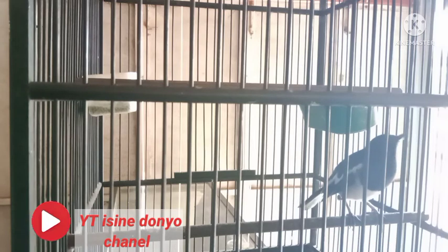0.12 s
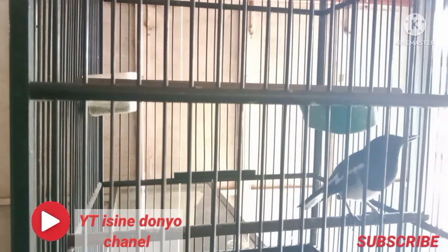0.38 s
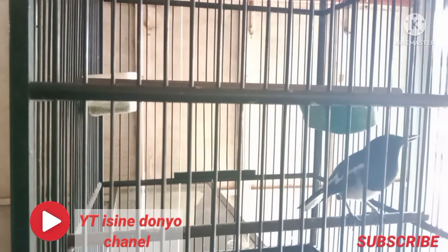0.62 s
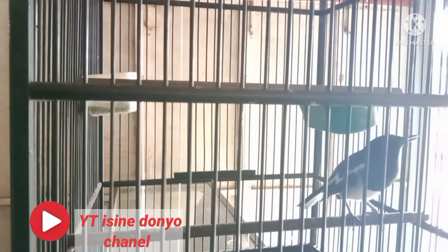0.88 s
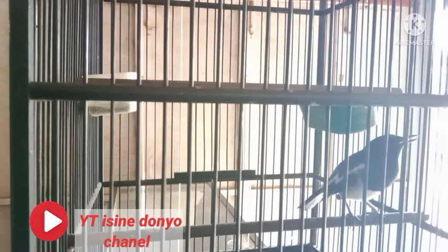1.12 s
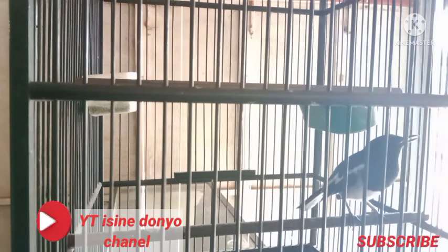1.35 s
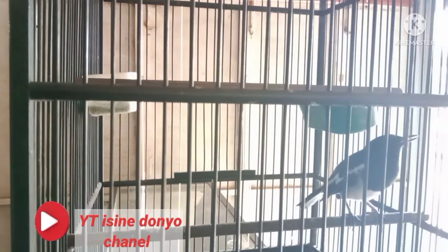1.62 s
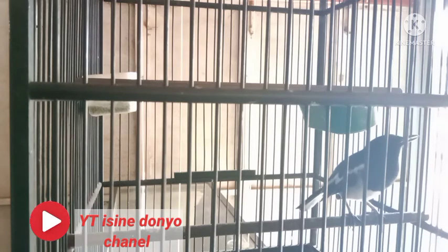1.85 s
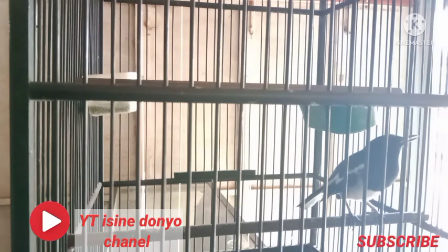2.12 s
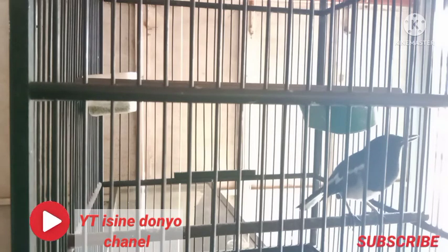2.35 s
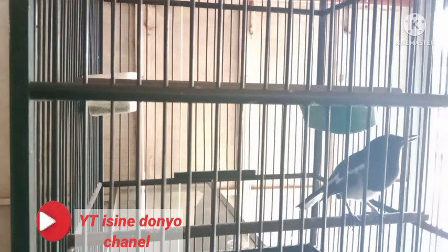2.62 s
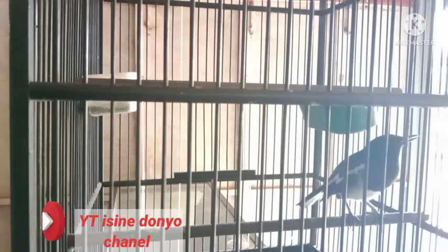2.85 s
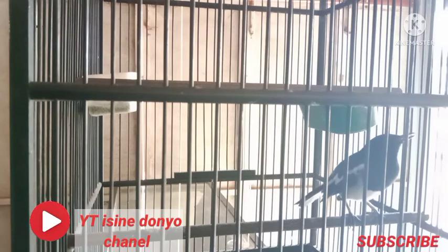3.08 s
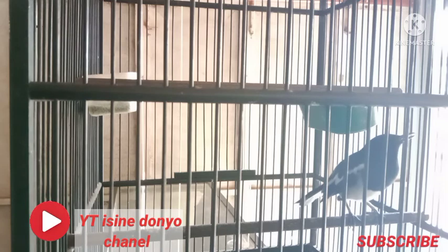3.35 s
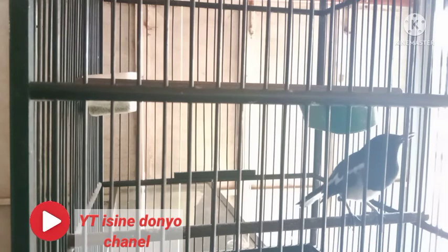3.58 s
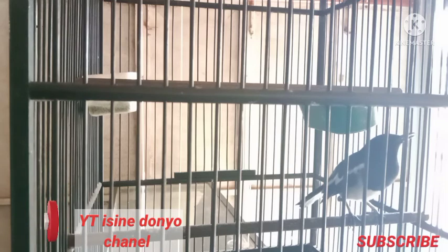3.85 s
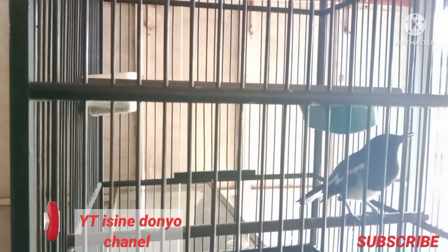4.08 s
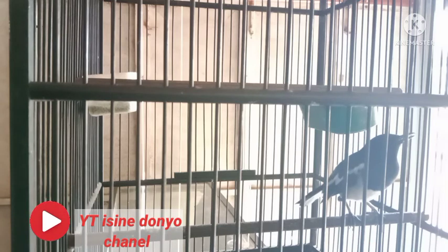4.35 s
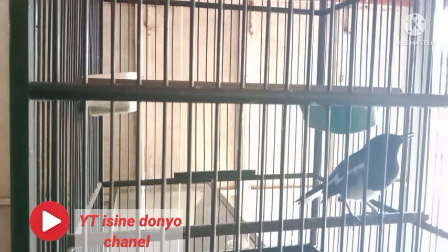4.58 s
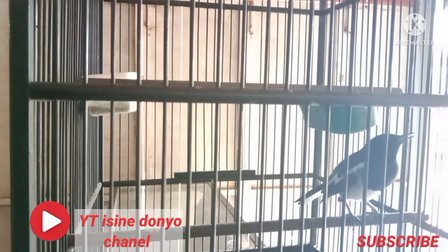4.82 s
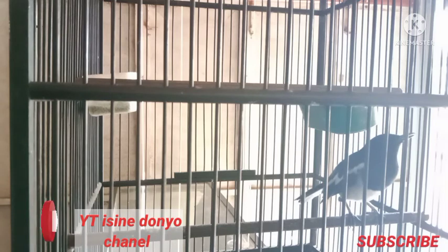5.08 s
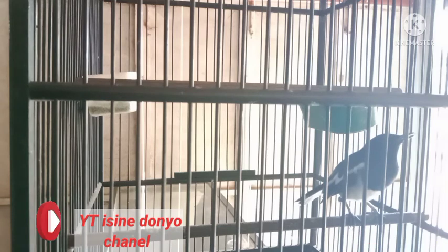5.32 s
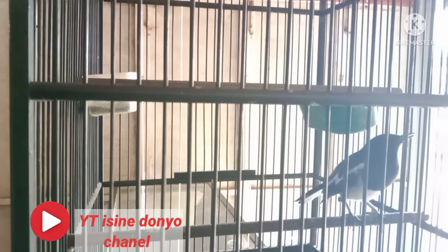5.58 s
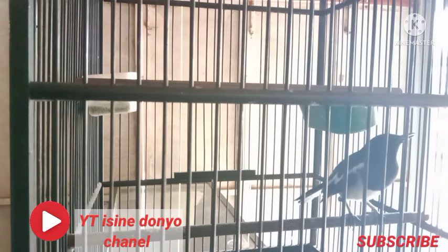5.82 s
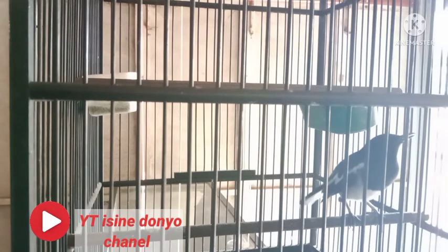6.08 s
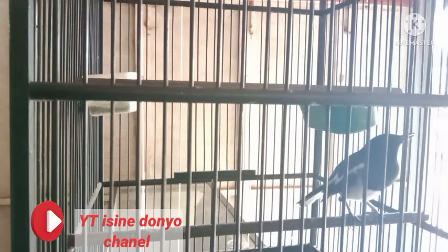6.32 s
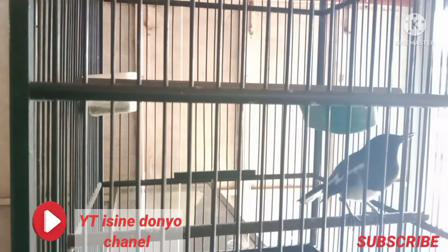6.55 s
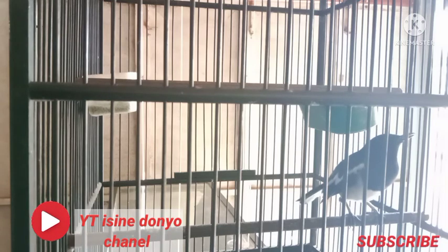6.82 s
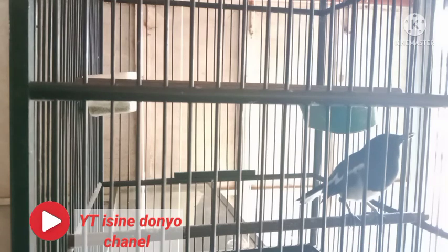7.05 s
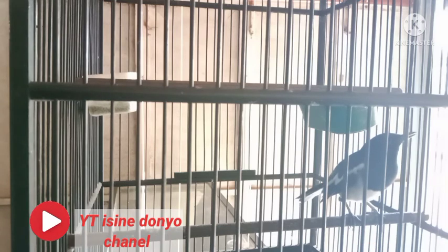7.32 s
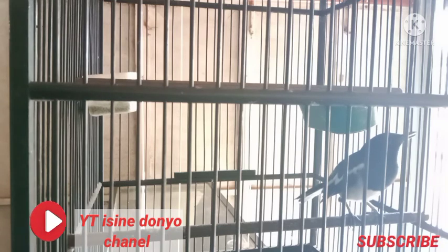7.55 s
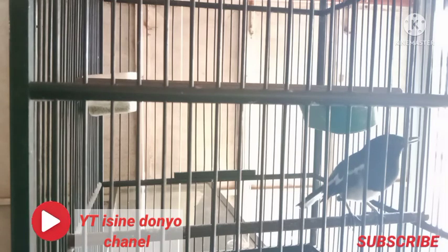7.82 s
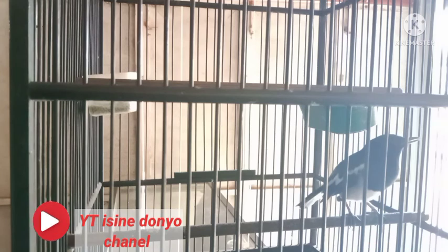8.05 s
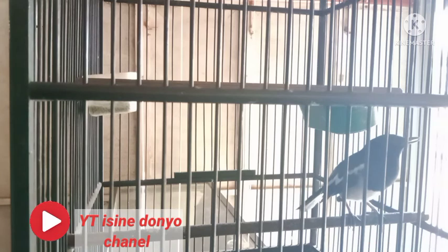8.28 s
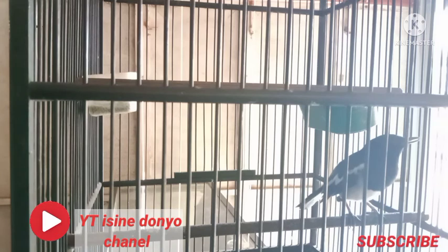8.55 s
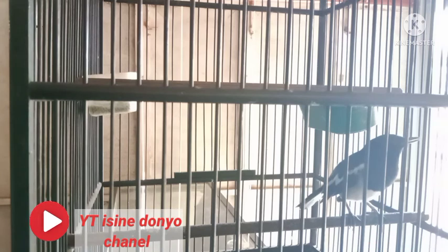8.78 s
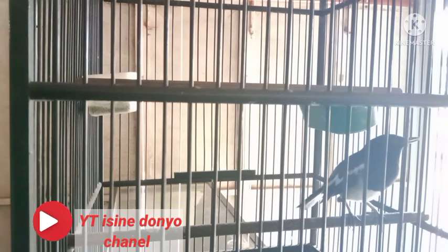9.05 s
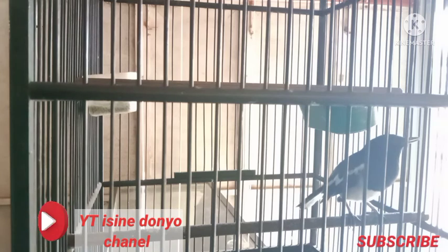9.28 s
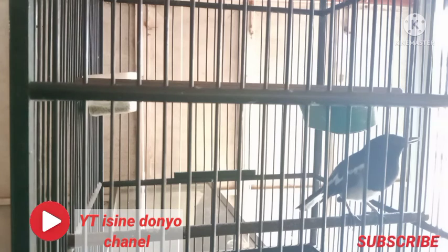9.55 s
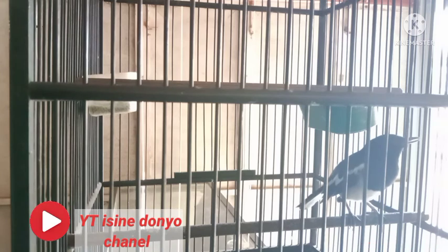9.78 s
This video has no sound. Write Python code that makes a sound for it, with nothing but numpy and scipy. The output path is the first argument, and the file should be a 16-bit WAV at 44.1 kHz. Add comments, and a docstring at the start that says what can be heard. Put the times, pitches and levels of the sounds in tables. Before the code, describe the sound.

A small caged bird sings close by in a hard-walled porch. Soft, spaced nasal ticks and chirps come first, then a rapid twitter grows into loud whistles, squawks and a piercing squeal. Three sharp falling sweeps follow, then clicking chirps, a harsh buzzy rasp and sparse quiet notes. Street rumble and tyre hiss swell mainly under the loud song. A phone-like microphone suppresses the background between phrases.

```python
"""A caged songbird sings in a hard-walled porch: gliding whistles, nasal scratchy notes and a loud rasp.
Each note is a sum of overtones on a gliding pitch, shaped by throat and beak and answered by the walls.
Behind lie street noise, made of coloured flickering noise, a far motor hum of two wavering sines and
faint thin tones, one of them a motor whine; a faint sinking whine, likely a motor, shares the song's path.
A phone's noise suppressor lets them up mainly while the scene is loud; peaks over full scale clip."""
import sys
import numpy as np
from scipy import signal
from scipy.io import wavfile
from scipy.ndimage import uniform_filter1d, minimum_filter1d, map_coordinates

SR = 44100
rng = np.random.default_rng(int(sys.argv[2]) if len(sys.argv) > 2 else 0)


def store_wav(level_fs):
    """Save 16-bit WAV to argv[1]."""
    pcm = np.round(np.clip(np.atleast_2d(level_fs), -1, 1) * 32767)
    wavfile.write(sys.argv[1], SR, pcm.T.astype(np.int16))


def nominal_scale(level):
    """Amplitude ratio for a level in decibels (scalar or array-like)."""
    x = np.asarray(level, float) / 20
    return 10 ** x


N = 437031  # samples

# resonance of the throat: hz, level_db
THROAT_RESONANCE = [(800, -15.5), (1700, -12), (3400, -4.5), (4500, -7.5), (7500, -3.5), (9500, -11.5),
                    (12000, -43)]


def along(points, hz):
    """Interpolation on a logarithmic frequency axis through (Hz, value) points."""
    f, v = np.transpose(points)
    return np.interp(np.log(hz + 1), np.log(f + 1), v)


def unit(x):
    """Normalization to an rms of 1."""
    return x / np.sqrt(np.mean(x ** 2) + 1e-20)


def wobble(rate, size):
    """Band-limited random modulation: a smooth curve through rate random knots a second."""
    knots = rng.standard_normal(int(size * rate / SR) + 4)
    return map_coordinates(knots, [np.arange(size) * rate / SR])


def flicker(spectrum, patchy_db):
    """Nonstationary noise: narrow bands of a coloured spectrum come and go independently."""
    hz, _, z = signal.stft(rng.standard_normal(N), SR, nperseg=1024)
    field = uniform_filter1d(rng.standard_normal(z.shape), size=3, axis=0)
    field = uniform_filter1d(field, size=15, axis=1)
    corner_hz, corner_db = np.transpose(spectrum)
    colour_db = np.interp(np.log(hz + 1), np.log(corner_hz), corner_db, -120, -120)
    z = z * nominal_scale(colour_db[:, None] + patchy_db * unit(field))
    return unit(signal.istft(z, SR, nperseg=1024)[1][:N])


def spell(s, length, edge_s, first_db, last_db):
    """Amplitude envelope: straight ramps at both edges, and a level that moves evenly in dB between."""
    t = np.arange(N) / SR - s
    ramps = np.clip(np.minimum(t, length - t) / edge_s, 0, 1)
    return ramps * nominal_scale(np.interp(t, [0, length], [first_db, last_db]))


def scratches():
    """Turbulence: short bursts of air noise filtered by the throat, at the edges of notes."""
    # bursts: peak_s, peak_db
    scratch_rows = [(0, -34), (3.165, -21.5), (4.089, -29.5), (4.45, -30)]
    rise_s, t60_s = 0.004, 0.15  # the rise gains 20 dB in rise_s
    t = np.arange(N) / SR
    gain = 0
    for s, db in scratch_rows:
        slope_db = np.where(t < s, 20 * (t - s) / rise_s, -60 * (t - s) / t60_s)
        gain = gain + nominal_scale(db + slope_db)
    return gain * flicker(THROAT_RESONANCE, patchy_db=2.0)


def street():
    """Incoherent sum of far sources: steady bass and hiss, rumble, a rush of tyres, and surges of both."""
    # spectrum of the rumble: hz, density_db
    rumble_colour = [(130, -41), (240, 3.5), (650, -4), (850, -16.5), (1200, -39.5)]
    # spectrum of the tyre rush: hz, density_db
    rush_colour = [(600, -14), (850, -17.5), (1120, -5.5), (1350, -9), (1700, -7), (2400, -15),
                   (3060, -27.5), (5000, -42), (10000, -49)]
    # spectrum of the steady bass and hiss: hz, density_db
    steady_colour = [(60, -10.5), (200, -9.5), (400, -31), (6100, -34.5), (6700, -21), (10000, -32),
                     (12000, -48)]
    # course of the traffic: time_s, rush_db
    traffic_course = [(0, -46.5), (1.199, -52), (2, -42.5), (3.06, -39), (3.831, -36.5), (4.5, -44),
                      (5.7, -63.5), (7.6, -54.5), (8.1, -71.5), (9.91, -50.5)]
    # loud bursts of street noise: start_s, length_s, rumble_db, rush_db
    surge_rows = [(3.08, 0.77, -27, -20), (7.704, 0.348, -47.5, -42.5)]
    edge_s, rumble_db_per_s, rush_db_per_s = 0.077, -9, -13  # surges sink at these slopes
    rush_db = np.interp(np.arange(N) / SR, *np.transpose(traffic_course))
    rumble_db = -58 + 0.36 * (rush_db + 46.5)  # the rumble follows the rush weakly
    far = nominal_scale(-58.0) * flicker(steady_colour, patchy_db=6.5)
    far += nominal_scale(rumble_db) * flicker(rumble_colour, patchy_db=5.5)
    far += nominal_scale(rush_db) * flicker(rush_colour, patchy_db=3)
    low = sum(spell(s, d, edge_s, db, db + d * rumble_db_per_s) for s, d, db, _ in surge_rows)
    high = sum(spell(s, d, edge_s, db, db + d * rush_db_per_s) for s, d, _, db in surge_rows)
    return far + low * flicker(rumble_colour, patchy_db=4.5) + high * flicker(rush_colour, patchy_db=3.0)


def nasals():
    """Pitch glide at a constant rate: a held tone bends; louder notes swell more and are rougher."""
    # nasal notes: start_s, length_s, bend_share (of length, before the bend), held_hz, last_hz, peak_db,
    # overtone_fall_db (per overtone)
    nasal_rows = [(0.329, 0.074, 0.76, 836, 900, -34, -8.5), (0.76, 0.12, 0.52, 840, 1030, -33.5, -3),
                  (1.256, 0.048, 0.36, 1624, 1794, -32, -2.5), (1.856, 0.043, 0.504, 1235, 1152, -35.5, -4),
                  (4.031, 0.074, 0.71, 892.5, 770, -16.5, -2), (5.344, 0.096, 0.81, 895, 762.5, -17.5, -1),
                  (7.701, 0.09, 0.73, 1603, 1771, -18.5, -3.5),
                  (9.114, 0.055, 0.43, 1597, 1387, -38.5, -5.5)]
    bend_hz_per_s, peak_share = 11000, 0.88  # the level peaks at this share of the way to the bend
    scoop = 0.045  # share under the held pitch at the start
    swell, soft_db = 0.5, -42  # the onset lies this share of the way from the peak down to soft_db
    for s, length, share, hz, last_hz, db, fall_db in nasal_rows:
        onset = min(0.012, 0.42 * length)
        bend = length * np.clip(share, 0.35, 0.9)
        bent = min(bend + abs(last_hz - hz) / bend_hz_per_s + 0.00083, length - 0.001)
        peak = max(peak_share * bend, onset + 0.001)
        t = np.unique([0, onset, peak, bend, bent, length])
        pitch = np.interp(t, [0, onset, bend, bent], [hz * (1 - scoop), hz, hz, last_hz])
        onset_db = db - swell * (db - soft_db)
        level = np.interp(t, [0, onset, peak, length], [onset_db - 7.5, onset_db, db, db - 3.5])
        rough = 0.1 + 0.004 * (db + 37)
        yield fall_db, rough, np.transpose([s + t, pitch, level])


def warbles():
    """Free frequency modulation: whistles, rasps and one faint sinking whine follow their own contours."""
    # overtone_fall_db (per overtone), roughness (0-1), contour rows: time_s, pitch_hz, level_db;
    # the faint sinking whine at 7.86 s is likely a motor
    warble_rows = [(-64, 0.16, [(.4, 1755, -32), (.43, 2030, -40.5), (.457, 2950, -45)]),
                   (-6.5, 0.091, [(1.325, 2598, -33.5), (1.369, 4684, -23), (1.389, 4605, -37),
                   (1.415, 3737, -39.5), (1.455, 3724, -29), (1.5, 3750, -32.5), (1.545, 4230, -33.5),
                   (1.577, 4719, -22)]), (-6, 0.047, [(1.98, 3370, -41), (1.996, 3937, -35),
                   (2.132, 4260, -32), (2.168, 4170, -29.5), (2.19, 2894, -41.5), (2.222, 2910, -67),
                   (2.234, 3380, -26.5), (2.244, 3280, -45)]), (-40, 0.029, [(2.335, 2500, -35),
                   (2.369, 2580, -25), (2.382, 2985, -28.5), (2.395, 2224, -27)]),
                   (-16.5, 0.075, [(2.457, 3180, -38.5), (2.475, 3760, -28.5), (2.492, 3533, -28),
                   (2.501, 3700, -37), (2.527, 3150, -23.5)]), (-10, 0.066, [(2.528, 2723, -39),
                   (2.603, 3280, -33.5)]), (-10, 0.045, [(2.707, 3553, -41.5), (2.737, 3930, -29),
                   (2.751, 3127, -28), (2.772, 3543, -27), (2.787, 3060, -39), (2.798, 2290, -30)]),
                   (-29.5, .03, [(3.108, 2900, -36.5), (3.125, 3500, -30), (3.15, 3770, -28.5)]),
                   (-10.5, .04, [(3.03, 4190, -48.5), (3.045, 4800, -40.5), (3.078, 4825, -33),
                   (3.092, 4780, -19.5), (3.14, 4805, -13), (3.16, 3190, -27.5)]),
                   (-10.5, 0.058, [(3.175, 2563, -23), (3.191, 4150, -18), (3.235, 4400, -15),
                   (3.28, 4054, -12.5), (3.3, 4150, -19), (3.315, 3440, -21.5)]),
                   (-14, 0.021, [(3.33, 3656, -13), (3.37, 3777, -22), (3.385, 3981, -18.5),
                   (3.474, 3730, -14), (3.51, 3460, -22.5)]), (-21.5, .021, [(3.668, 2500, -19),
                   (3.712, 2792, -22), (3.74, 2514, -20.5)]), (-23, .03, [(4.451, 1897, -34),
                   (4.458, 3520, -13), (4.47, 3100, -12), (4.483, 2640, -22.5)]),
                   (-10, 0.14, [(4.772, 3190, -35), (4.79, 4432, -26.5), (4.812, 4583, -18),
                   (4.83, 5840, -10), (4.85, 5940, -8.5), (4.925, 6385, -7.5), (5.03, 6070, -10)]),
                   (-9.5, 0.46, [(4.87, 2590, -36.5), (4.99, 3801, -27.5), (5.03, 3850, -33.5)]),
                   (-6.5, 0.065, [(5.74, 1397, -41.5), (5.768, 1915, -26.5), (5.794, 2186, -28)]),
                   (-37, .03, [(5.796, 2271, -22.5), (5.862, 3070, -23), (5.892, 3543, -25)]),
                   (-5, 0.052, [(5.892, 3678, -32.5), (5.912, 5900, -29), (5.919, 5520, -24),
                   (5.938, 5400, -9.5), (5.952, 4850, -15), (5.972, 4540, -15.5), (5.976, 4800, -18),
                   (5.987, 3850, -19.5), (5.998, 4950, -16.5), (6.006, 4150, -25.5), (6.014, 5000, -26.5),
                   (6.026, 4600, -29)]), (-37, 0.053, [(7.305, 2850, -23.5), (7.333, 2954, -27.5),
                   (7.349, 2439, -14.5), (7.369, 3130, -29), (7.387, 2648, -18.5), (7.407, 2230, -24)]),
                   (-1, 0.66, [(7.86, 2127, -39), (7.995, 1994, -52.5)]), (-2, .16, [(8.416, 1499, -45),
                   (8.47, 1735, -35), (8.54, 1806, -31.5), (8.705, 2133, -36)]),
                   (-14.5, 0.398, [(9.14, 2280, -42), (9.172, 2258, -30.5), (9.184, 3007, -40),
                   (9.192, 2230, -32.5)]), (-8.5, 0.068, [(9.57, 3485, -50.5), (9.602, 4354, -31),
                   (9.732, 5222, -28), (9.77, 4500, -33), (9.802, 4885, -27.5), (9.82, 2475, -40.5)])]
    yield from warble_rows


def trills():
    """Alternating frequency modulation: swings start high, shorten and sink, louder at the high turns."""
    # trills: start_s, length_s, high_hz, low_hz, low_db, overtone_fall_db (per overtone), swings (count)
    trill_rows = [(1.568, 0.066, 5030, 2475, -29.5, -10, 5)]
    shrink, sink, high_db, rough = 0.66, 0.022, 1.5, 0.073  # length ratio and pitch share per swing
    for s, length, high_hz, low_hz, db, fall_db, swings in trill_rows:
        k = np.arange(round(swings) + 1)
        t = s + length * (1 - shrink ** k) / (1 - shrink ** k[-1])
        pitch = np.where(k % 2, low_hz, high_hz) * (1 - sink * k)
        yield fall_db, rough, np.transpose([t, pitch, db + high_db * (1 - k % 2)])


def chirps():
    """Rapid frequency glide: the pitch scoops up, sags and drops, loudest where the drop begins."""
    # chirps: start_s, length_s, drop_share (of length, before the drop), top_hz, last_hz, peak_db,
    # overtone_fall_db (per overtone)
    chirp_rows = [(3.603, 0.05, 0.49, 3556, 3250, -8.5, -30), (7.119, 0.051, 0.77, 2676, 2070, -20, -43.5),
                  (7.244, 0.089, 0.37, 3740, 3190, -25.5, -31.5),
                  (7.431, 0.0091, 0.56, 4903, 2237, -25.5, -17),
                  (9.868, 0.071, 0.31, 3500, 3070, -28.5, -21)]
    scoop, scoop_s, sag, rough = 0.13, 0.008, 0.038, 0.024  # scoop and sag are shares under the top
    for s, length, knee, hz, last_hz, db, fall_db in chirp_rows:
        knee = np.clip(knee, 0.4, 0.95)
        yield fall_db, rough, [
            (s, hz * (1 - scoop), db - 11.5),
            (s + min(scoop_s, 0.28 * length), hz, db - 5),
            (s + knee * length, hz * (1 - sag), db),
            (s + length, last_hz, db - 1)]


def sweeps():
    """Stepped frequency sweep: the pitch climbs to a top, falls to a sagging ledge and falls again."""
    # sweeps: start_s, top_s (time near the top), drop_s (fall to the ledge), length_s, last_hz,
    # top_db, ledge_db
    sweep_rows = [(6.096, .022, 0.0091, 0.095, 2383, -9, -16.5),
                  (6.277, 0.023, .028, 0.11, 2554, -17.5, -14.5),
                  (6.47, 0.0026, 0.028, 0.088, 1887, -12, -20.5)]
    start_hz, top_hz, ledge_hz, ledge_end_hz = 5900, 6830, 4800, 4380
    fall_db, rough, ledge_end = -8, 0.019, 0.71  # per overtone; 0-1; share of length
    for s, top, drop, length, last_hz, top_db, ledge_db in sweep_rows:
        yield fall_db, rough, [
            (s, start_hz, top_db - 11),
            (s + 0.55 * top, top_hz, top_db - 9.5),
            (s + top, 0.98 * top_hz, top_db),
            (s + top + drop, ledge_hz, ledge_db - 3),
            (s + ledge_end * length, ledge_end_hz, ledge_db),
            (s + length, last_hz, ledge_db - 6.5)]


def note(fall_db, rough, rows):
    """Source and filter: the syrinx gives overtones of an unsteady pitch, and the throat colours them."""
    # unstable stretches, where the vibration repeats only every few cycles, adding lines between the
    # overtones, and the pitch trembles: start_s, end_s, period_cycles, depth_db, tremble_share
    fork_rows = [(4.872, 5.014, 2, -22.5, 0.059), (5.354, 5.396, 5, -7.5, 0.019),
                 (5.942, 6.02, 3, -3, 0.004), (7.695, 7.744, 2, 2.5, 0.019),
                 (7.757, 7.823, 2, -2.5, 0.0041), (8.461, 8.528, 2, -39, .06), (8.531, 8.7, 2, -13.5, .13),
                 (0.837, 0.89, 2, -7.5, 0.061), (4.079, 4.099, 3, -2.5, 0.027)]
    # the other half of the syrinx joins the long rasp: time_s, pitch_hz, level_db (over the first voice)
    second_voice = [(8.449, 2112, -7), (8.469, 2869, 2.5), (8.518, 3000, -4), (8.69, 2500, -8)]
    second_mix = 0.34  # depth of its beating with the first voice, giving sum and difference tones
    hole_hz, hole_width_hz, hole_per_db = 5700, 800, 3  # gap in the overtones, deeper with less effort

    s, hz, db = np.transpose(rows)
    t = np.arange(s[0], s[-1], 1 / SR)
    size = len(t)
    swing = np.sin(2 * np.pi * np.cumsum(60 + 14 * wobble(30, size)) / SR)
    waver = 0
    for start, end, _, _, share in fork_rows:
        waver = waver + share * np.clip(np.minimum(t - start, end - t) / 0.01, 0, 1)
    level_db = np.interp(t, s, db)
    slack_db = max(db) - level_db  # less effort gives a darker and cleaner tone
    # once strained, it stays rough
    rough = rough * nominal_scale(-0.6 * (max(db) - np.maximum.accumulate(level_db)))

    contour = np.interp(t, s, hz)
    smooth = uniform_filter1d(contour, size=SR // 200, mode="nearest")
    drift = (0.005 + 0.3 * rough ** 2) * wobble(50, size)
    jitter = 0.085 * rough * wobble(400, size)
    pitch = smooth * (1 + waver * swing + drift + jitter)
    phase = 2 * np.pi * np.cumsum(pitch) / SR

    k = np.arange(1, 15)[:, None]  # overtone number, 1 = fundamental
    gain = nominal_scale((fall_db - 0.18 * slack_db) * (k - 1) + along(THROAT_RESONANCE, k * pitch))
    gain *= k * pitch < 16000
    # at full effort the gap turns into a slight bump
    hole_shape = (k > 1) * np.exp(-((k * pitch - hole_hz) / hole_width_hz) ** 2)
    gain *= nominal_scale(-hole_per_db * np.minimum(slack_db - 1.5, 8) * hole_shape)
    # rough overtones break up one by one
    gain *= nominal_scale(8.1 * rough * np.array([wobble(60, size) for _ in k]))
    overtones = gain * np.cos(k * phase + np.pi * rng.random(k.shape))
    tone = overtones.sum(0) / np.sqrt((gain ** 2).sum(0) / 2)

    for start, end, cycles, depth_db, _ in fork_rows:
        fade = np.clip(np.minimum(t - start, end - t) / 0.011, 0, 1)
        tone *= 1 + nominal_scale(depth_db) * np.cos(phase / round(cycles)) * fade
    when, other_hz, other_db = np.transpose(second_voice)
    other_pitch = np.interp(t, when, other_hz) * (1 + waver * wobble(110, size)) * pitch / contour
    other_gain = nominal_scale(np.interp(t, when, other_db, -120, -120))
    other = other_gain * np.cos(2 * np.pi * np.cumsum(other_pitch) / SR)
    tone = tone * (1 + second_mix * other) + other
    tone *= 1 + 1.9 * rough * wobble(1500, size)  # uneven closing of the membranes
    # a trembling tone also stutters in strength
    tone *= 1 + np.minimum(7 * waver, 0.35) * wobble(250, size)
    edge = np.clip(np.minimum(t - s[0], s[-1] - t) / 0.0029, 0, 1)
    return tone * edge * nominal_scale(level_db)


def bird():
    """Radiation from a small aperture: the beak passes little under 900 Hz; the faint whine shares the path."""
    out = np.zeros(N + SR)
    for fall_db, rough, rows in [*nasals(), *warbles(), *trills(), *chirps(), *sweeps()]:
        sound = note(fall_db, rough, rows)
        out[round(rows[0][0] * SR):][:len(sound)] += sound
    beak = signal.butter(4, 900, "high", fs=SR, output="sos")
    return signal.sosfilt(beak, out[:N] + scratches())


def porch(x):
    """Reverberation: each frequency decays at its own speed; the answer changes as the bird turns."""
    # decay of the walls' answer: hz, t60_s
    porch_decay = [(800, 0.22), (3500, 0.25), (11000, 0.26)]
    out, hop = np.zeros(N + 2 * SR), SR // 4
    for start in range(0, N, hop):
        hz, t, z = signal.stft(rng.standard_normal(SR // 2), SR, nperseg=256)
        z = z * nominal_scale(-60 * t / along(porch_decay, hz)[:, None])
        tail = signal.istft(z, SR, nperseg=256)[1]
        # overlapping windows crossfade from one answer to the next
        window = np.hanning(2 * hop)[max(hop - start, 0):][:N - start + hop]
        part = x[max(start - hop, 0):start + hop] * window
        wet = signal.fftconvolve(part, tail / np.linalg.norm(tail))
        out[max(start - hop, 0) + 130:][:len(wet)] += wet  # 130 samples: 3 ms of delay
    return out[:N]


def motor():
    """Beating of two neighbouring unsteady sines makes a throbbing hum; faint thin tones join."""
    # spells of hum: start_s, length_s, first_db, last_db
    hum_rows = [(5.933, 0.87, -52, -65.5), (6.698, 0.188, -51.5, -54.5), (7.132, 0.098, -50.5, -41),
                (7.74, 0.27, -29, -40.5)]
    # faint thin tones in the background, the one at 1930 Hz a motor whine:
    # start_s, length_s, pitch_hz, level_db
    tone_rows = [(4.05, 0.38, 612, -48.5), (4.403, 0.26, 1150, -38), (6.67, 0.23, 1930, -52)]
    hum_hz, beat_hz, beat = 235, 58.4, 0.6  # the next shaft order lies beat_hz above, at this share

    def line(hz, drift=0.025):
        """Random frequency and amplitude modulation of one sine."""
        wave = np.sin(2 * np.pi * hz * np.cumsum(1 + drift * wobble(36, N)) / SR)
        return wave * nominal_scale(3.5 * wobble(45, N) + 4.6 * wobble(7.2, N))

    gain = sum(spell(s, length, 0.015, first_db, last_db) for s, length, first_db, last_db in hum_rows)
    hum = gain * (line(hum_hz) + beat * line(hum_hz + beat_hz))
    return hum + sum(spell(s, length, 0.077, db, db) * line(hz, 0.015) for s, length, hz, db in tone_rows)


def scene():
    """Superposition of the direct song, its reverberation, the street, and the hum with its thin tones."""
    song = bird()
    return (nominal_scale(2.0) * song + nominal_scale(-1.5) * porch(song) + street() + motor())[None]


def suppressor(x, open_db, band_open_db, slope, depth_db, size):
    """Downward expansion: a band sinks when it and the whole sound (held size frames) are both weak."""
    z = signal.stft(x, nperseg=512, noverlap=384)[2]
    power = np.abs(z) ** 2
    level_db = 10 * np.log10(power.sum(1, keepdims=True) + 1e-12)
    held_db = -minimum_filter1d(-level_db, size=size, origin=size // 2)
    band_power = uniform_filter1d(uniform_filter1d(power, size=3, axis=1), size=9, axis=2)
    band_db = 10 * np.log10(np.abs(band_power) + 1e-12)
    over_db = np.maximum(held_db - open_db, band_db - band_open_db)
    gain_db = np.clip(slope * over_db, -depth_db, 0)
    # dying echoes are cut short in the treble, above about 2.4 kHz
    recent_db = -minimum_filter1d(-level_db, size=61, origin=30)
    echo_db = np.clip(slope * (uniform_filter1d(level_db, size=5) - recent_db + 20.5), -10, 0)
    gain_db += echo_db * (np.arange(z.shape[1]) > 28)[:, None]
    gain = nominal_scale(uniform_filter1d(np.maximum(gain_db, -depth_db), size=3))
    return signal.istft(z * gain, nperseg=512, noverlap=384)[1][:, :N]


def low_pass(x):
    """Removes everything above the highest recorded frequency."""
    return signal.sosfilt(signal.butter(12, 15800, fs=SR, output="sos"), x)


def record(dry):
    """Dynamic processing: noise suppression, then clipping at full scale."""
    x = suppressor(dry, open_db=-27, band_open_db=-47.5, slope=0.95, depth_db=17.0, size=19)
    mix = np.clip(x, -1, 1)
    return low_pass(mix)


dry = scene()
out = record(dry)
store_wav(out)
```